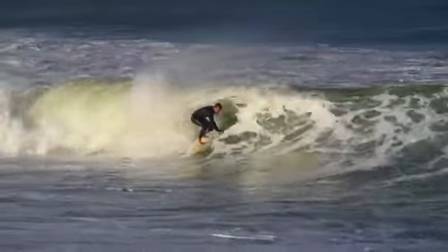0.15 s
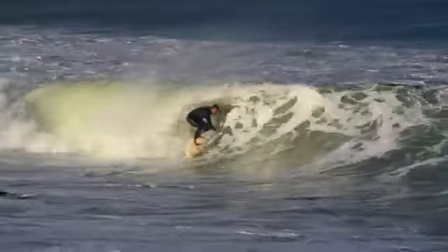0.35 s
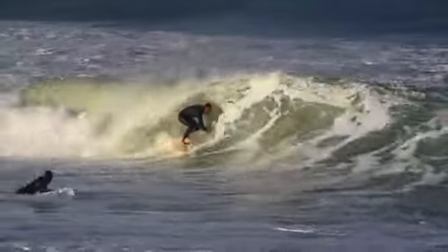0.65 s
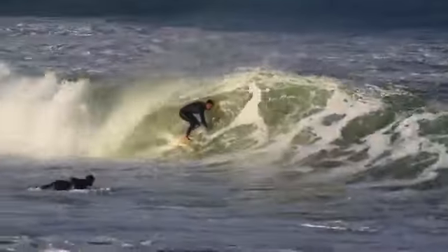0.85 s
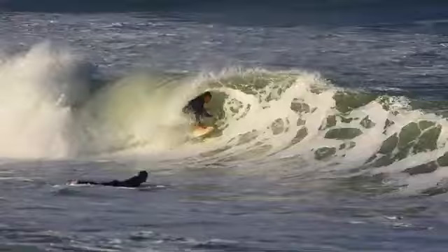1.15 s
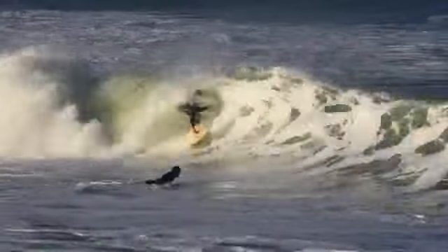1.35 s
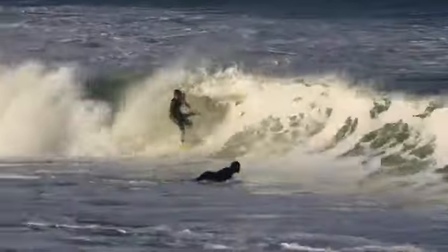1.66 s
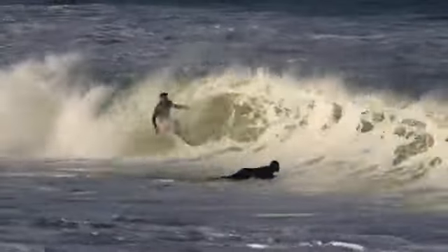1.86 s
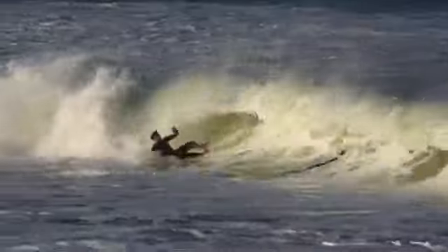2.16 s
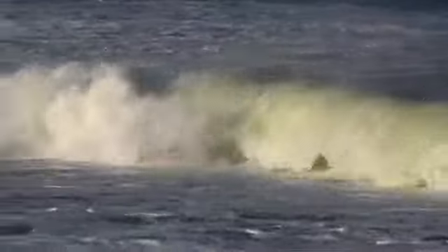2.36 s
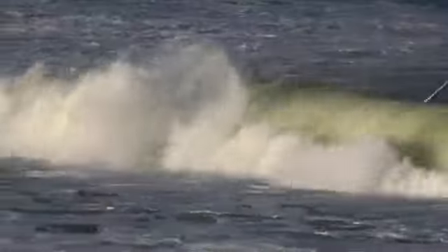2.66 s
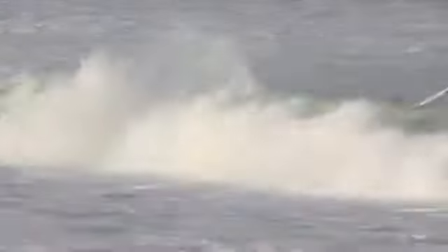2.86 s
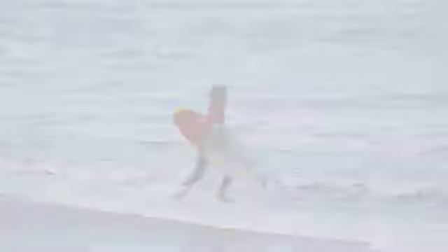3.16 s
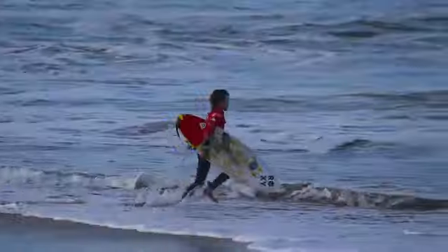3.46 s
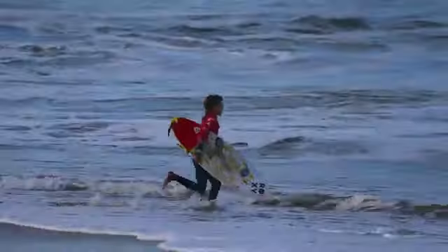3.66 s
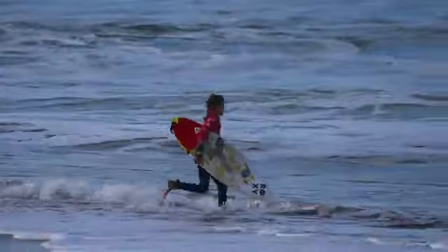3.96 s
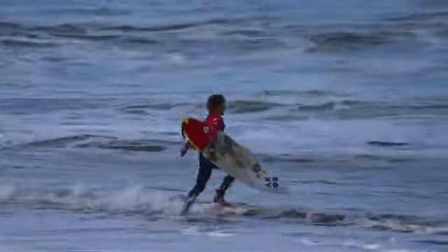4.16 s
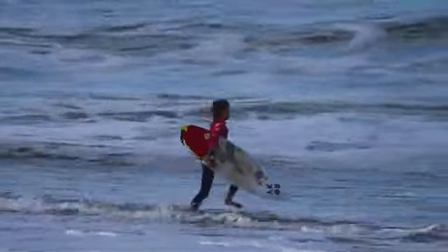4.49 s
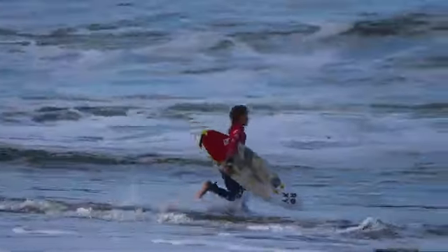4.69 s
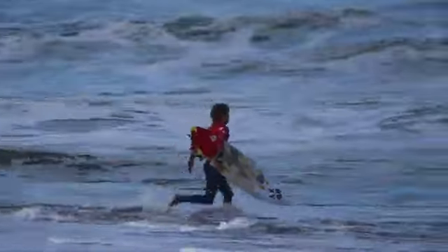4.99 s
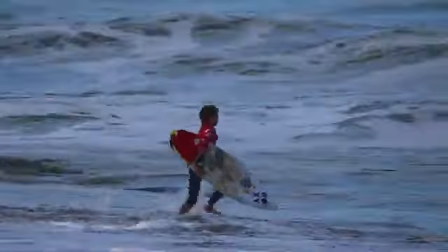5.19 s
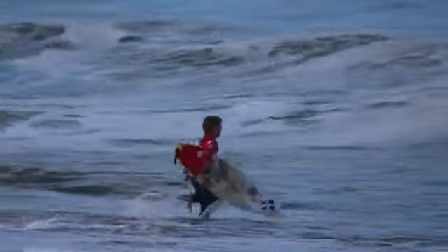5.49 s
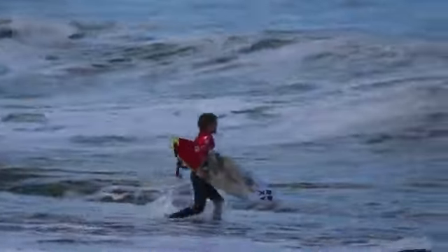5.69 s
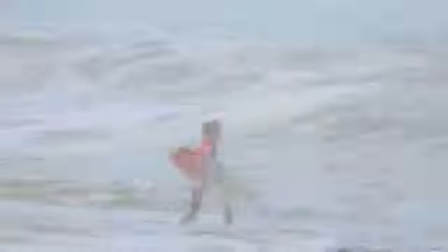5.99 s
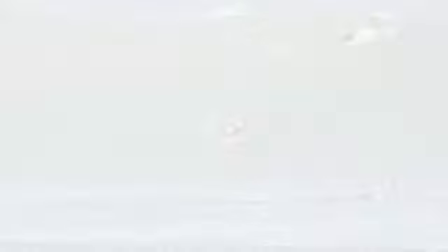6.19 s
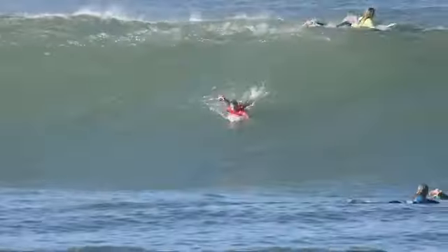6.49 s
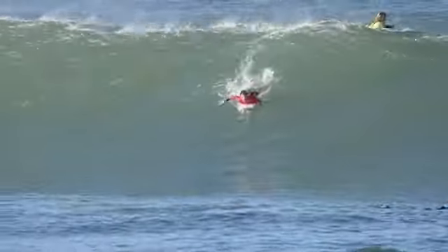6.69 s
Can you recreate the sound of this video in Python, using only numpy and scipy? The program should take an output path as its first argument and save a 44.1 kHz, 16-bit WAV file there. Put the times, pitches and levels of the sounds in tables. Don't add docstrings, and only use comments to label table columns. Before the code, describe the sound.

Outdoors on a windy beach, distant breakers roar steadily and build slightly. At about three seconds a tick and short thump mark an abrupt change to a fuller shore wash, which grows from quieter to stronger while heavier wind buffets the microphone. A tiny hush near six seconds leads into a final, duller swell that eases off.

```python
import sys
import numpy as np
from scipy import signal
from scipy.fft import rfft, irfft, next_fast_len
from scipy.io import wavfile
from scipy.ndimage import uniform_filter1d

SR = 44100
rng = np.random.default_rng(int(sys.argv[2]) if len(sys.argv) > 2 else 0)


def pcm_store(signal):
    levels = np.round(np.clip(np.atleast_2d(signal), -1, 1) * 32767)
    wavfile.write(sys.argv[1], SR, levels.astype(np.int16).T)


def convert_level_to_amplitude(level_db):
    exponent = np.asarray(level_db, float) / 20
    return 10 ** exponent


N = 301644

# start t/s, end t/s
SCENES = [
    (0, 3.1291),
    (3.1291, 6.2256),
    (6.2256, 6.84),
]
CUT_S = [3.1291, 6.2256]
# tick level/dB, tick direction, pressure jump level/dB, rise t/s, fall t/s
CUTS = [
    (-35, 1, -16.5, .0006, .005),
    (-42, -1, -36, .001, .004),
]
THUMP_LAG_S = .0007
GAP_S, GAP_DB = 6.2155, -32
FADE_S, FADE_DB = 0.22, -2.5

HISS_DB = [-121.5, -124, -124.5]
# t/s, level/dB
WHINE = [
    (0, -80.5),
    (1.2, -81.5),
    (1.4, -84),
    (1.75, -77),
    (3.1, -81),
    (3.5, -83),
    (4.3, -87),
    (6.84, -94),
]
WHINE_HZ, WHINE_WIDTH_HZ = 7020, 40

# buffeting level/dB, rumble level/dB, flutter level/dB, top of buffeting f/Hz
BREEZE = [
    (-31.5, -44, -44.5, 11.6),
    (-23, -37, -45, 15.4),
    (-20.5, -36, -44.5, 15.9),
]
# t/s, lift level/dB, half length t/s
GUSTS = [(0.2, 4.5, 0.34), (0.56, 9, 0.069), (0.96, 7.5, 0.16), (1.37, 6.5, 0.11), (1.62, 3, 0.15),
         (1.86, -6, 0.054), (2.25, 7.5, 0.13), (2.56, 8, 0.061), (2.86, 7, 0.08), (3.3, 11, 0.15),
         (3.8, 8, 0.15), (4.04, 6.5, 0.13), (4.29, 12, 0.13), (4.61, 12, 0.15), (5.02, 7, 0.083),
         (5.52, 7, 0.22), (6.22, 4.5, 0.095), (6.52, 2.5, 0.06)]
# t/s, lift level/dB
PUFFS = [(0.1, 4), (0.37, 6), (0.62, 9), (0.83, 5), (1.01, 3), (1.27, 13), (1.52, 5), (1.72, 2), (2.02, 5),
         (2.22, 7), (2.42, 10), (2.95, 0), (3.2, 7.5), (3.48, 6), (3.76, 12), (3.92, 10), (4.1, 4),
         (4.35, 6.5), (4.68, 10), (5.03, 6), (5.42, 5.5), (5.62, 1), (5.92, 4.5), (6.37, 0), (6.51, 5),
         (6.8, 1)]
PUFF_S, FLUTTER_FOLLOWS = 0.049, 0.36

# t/s, vigour of the breaking level/dB, brightness from spray level/dB
SURGE = [
    [(0, -2, 0.8), (0.35, -2, 0.4), (1.05, -1, 0.4), (1.3, -0.5, -0.5), (2.12, 1.5, 0.8), (2.5, 1.8, -0.2),
     (2.9, 3, -1.1), (3.13, 1, -0.3)],
    [(3.13, -3.5, 1.5), (3.5, -3, 0.4), (4.2, -0.5, -0.1), (4.9, 2, 0), (5.3, 1.55, 0.5), (5.7, 2.9, 1),
     (6.1, 2.5, 0.6)],
    [(6.23, 2, 0), (6.45, 0.26, 0.3), (6.84, -0.8, -0.1)],
]
# f/Hz, level/dB per Hz
BREAKER = [(110, -64.5), (175, -70.5), (260, -67.5), (420, -68), (700, -73.5), (1100, -80), (1900, -83),
           (2900, -87), (3900, -89), (4700, -99), (6500, -99.6), (7600, -104.7), (10000, -111.7),
           (15500, -120.5)]
# f/Hz, level/dB per Hz
SHORE = [(70, -60), (175, -73), (260, -70.5), (420, -69), (700, -71), (1100, -73.5), (1900, -80),
         (2900, -88.5), (3900, -91.5), (4700, -99.1), (6500, -101.7), (7600, -107.9), (10000, -114.8),
         (15500, -124.2)]
# f/Hz, level/dB per Hz
SWELL = [(70, -65), (175, -73), (260, -72.5), (420, -72.5), (700, -76), (1100, -80), (1900, -85.5),
         (2900, -93), (3900, -96.5), (4700, -103.4), (6500, -108.0), (7600, -115.2), (10000, -120.0),
         (15500, -124.8)]
# f/Hz, width f/Hz, level/dB
DIPS = [(4550, 260, -1), (6800, 120, -1), (7260, 230, -1.5), (8660, 700, -1.2)]
LAYER_HZ = [350, 1100, 2900, 6500]
# roar, wash, foam, spray [dB per dB]
FOLLOWS = [(0.67, 0.96, 1.13, 0.97), (0.45, 1.2, 0.7, 0.85), (0.6, 0.4, 2.3, 1.6)]
# roar, wash, foam, spray [dB per dB]
BRIGHTENS = (-0.18, -0.62, 0.12, 1.9)
# t/s, lift level/dB, half length t/s
CRASHES = [(0.42, 1.5, 0.098), (1.04, 2, 0.069), (1.46, 1, .08), (2.28, 1.5, .1), (2.8, 1.5, .12),
           (3.95, 1, 0.14), (4.82, 1, 0.077), (5.05, 1.5, 0.061), (6.03, 2.5, .1)]
# roar, wash, foam, spray [dB per dB]
CRASH_SHARE = (1, 0.56, 0.2, 0.05)


def rms_one(x):
    return x / np.sqrt(np.mean(x ** 2) + 1e-20)


def in_time(rows):
    s, *columns = np.transpose(rows)
    return [np.interp(np.arange(N) / SR, s, c) for c in columns]


def lifts(rows):
    t = np.arange(0, N + 64, 64) / SR
    s, db, half = np.transpose(rows)[:, :, None]
    bells = db * np.exp(-((t - s) / half) ** 2)
    return np.interp(np.arange(N) / SR, t, np.sum(bells, axis=0))


def drift(rate):
    r = np.exp(-80 * np.pi * rate / SR)
    noise = rng.standard_normal(N // 40 + 2002)
    slow = signal.lfilter([1], [1, -2 * r, r * r], noise)[2000:]
    return np.interp(np.arange(N) / 40, np.arange(len(slow)), rms_one(slow))


def evened(x, span_s, share):
    power = uniform_filter1d(x ** 2, size=max(3, int(span_s * SR)))
    return rms_one(x / (power + 0.086 * np.mean(power)) ** (share / 2))


def hiss(level_db):
    sos = signal.butter(2, 7000, "high", fs=SR, output="sos")
    return convert_level_to_amplitude(level_db) * np.sqrt(SR / 2) * signal.sosfilt(sos, rng.standard_normal(N))


def whine():
    r, w = np.exp(-np.pi * WHINE_WIDTH_HZ / SR), 2 * np.pi * WHINE_HZ / SR
    tone = signal.lfilter([1, 0, -1], [1, -2 * r * np.cos(w), r * r], rng.standard_normal(N))
    return convert_level_to_amplitude(in_time(WHINE)[0]) * rms_one(tone)


def cuts():
    t, out = np.arange(N) / SR, np.zeros(N)
    for s, (tick_db, way, jump_db, rise, fall) in zip(CUT_S, CUTS):
        out += way * (t >= s) * convert_level_to_amplitude(tick_db) * np.exp(-np.maximum(t - s, 0) / .002)
        age = np.maximum(t - s - THUMP_LAG_S, 0)
        onset = (age / rise) ** 2 / (1 + (age / rise) ** 2)
        out -= convert_level_to_amplitude(jump_db) * onset * np.exp(-age / fall)
    return out


def eddies(low_hz, high_hz, order, span_s, share):
    sos = signal.butter(order, [low_hz, high_hz], "band", fs=SR, output="sos")
    return evened(signal.sosfilt(sos, rng.standard_normal(N + SR))[SR:], span_s, share)


def wind(breeze):
    breeze_buffet_db, breeze_rumble_db, breeze_flutter_db, buffet_top_hz = breeze
    puff_db = lifts([(s, db, PUFF_S) for s, db in PUFFS])
    buffet_db = breeze_buffet_db + lifts(GUSTS)
    rumble_db = breeze_rumble_db + puff_db
    flutter_db = breeze_flutter_db + FLUTTER_FOLLOWS * puff_db - 2.5
    buffet = convert_level_to_amplitude(buffet_db) * eddies(4.4, buffet_top_hz, order=3, span_s=0.17, share=0.86)
    rumble = convert_level_to_amplitude(rumble_db) * eddies(16, 41, order=4, span_s=0.04, share=0.89)
    flutter = convert_level_to_amplitude(flutter_db) * eddies(43, 79, order=3, span_s=0.092, share=0.23)
    return buffet + rumble + flutter


def surf(spectrum, surge, follows, running, churn_db, patch_db):
    length = running.sum()
    size = next_fast_len(length)
    log_hz = np.log2(np.arange(1, size // 2 + 2) * SR / size)
    points = np.array(spectrum)
    colour_db = np.interp(log_hz, np.log2(points[:, 0]), points[:, 1])
    colour_db -= 14 * np.maximum(log_hz - np.log2(9500), 0)
    for hz, width_hz, db in DIPS:
        colour_db += db * np.exp(-((2 ** log_hz - hz) / width_hz) ** 2)
    sea = rfft(rng.standard_normal(size)) * np.sqrt(SR / 2) * convert_level_to_amplitude(colour_db)

    churn = drift(25) + 0.25 * drift(7.8)
    vigour_db, bright_db = in_time(surge)
    swell_db = np.outer(follows, vigour_db) + np.outer(BRIGHTENS, bright_db)
    swell_db += np.outer(CRASH_SHARE, lifts(CRASHES))

    out = np.zeros(N)
    for centre in np.arange(np.log2(100), np.log2(20000), .5):
        window = np.cos(np.pi * np.clip(log_hz - centre, -.5, .5)) ** 2
        share = [np.interp(centre, np.log2(LAYER_HZ), one) for one in np.eye(len(LAYER_HZ))]
        near = np.clip((centre - np.log2(250)) / 2, 0, 1)
        gain_db = share @ swell_db + near * churn_db * churn + patch_db * drift(7.1)
        out[running] += irfft(sea * window, size)[:length] * convert_level_to_amplitude(gain_db[running])
    return out


def scene():
    t = np.arange(N) / SR
    sea, air = np.zeros((2, N))
    for (start, end), spectrum, surge, follows, breeze, hiss_db in zip(
            SCENES, (BREAKER, SHORE, SWELL), SURGE, FOLLOWS, BREEZE, HISS_DB):
        running = (t >= start) & (t < end)
        sea += surf(spectrum, surge, follows, running, churn_db=0.46, patch_db=0.09)
        sea += running * hiss(hiss_db)
        fade_in = np.clip((t - start) / .02, 0, 1) if start else 1
        fade_out = np.clip((end - t) / .015, .2 * (end > CUT_S[-1]), 1)
        air += running * fade_in * fade_out * wind(breeze)

    end, start = GAP_S, SCENES[2][0]
    hush = convert_level_to_amplitude(GAP_DB)
    gate = np.interp(t, [end - .002, end, start, start + .0006], [1, hush, hush, 1])
    gate *= np.clip(np.abs(t - CUT_S[0]) / .0005, 0, 1)
    gate *= convert_level_to_amplitude(np.interp(t, [CUT_S[0] - FADE_S, CUT_S[0]], [0, FADE_DB], right=0))
    air_gate = np.interp(t, [end - .006, end, start, start + 0.00066], [1, 0, 0, 1])
    return (gate * (sea + whine()) + air_gate * air + cuts())[None]


def band_limit(x):
    return signal.sosfilt(signal.butter(12, 15720, fs=SR, output="sos"), x)


def record(dry):
    mix = 0.89 * np.tanh(dry / 0.91)
    return band_limit(mix)


dry = scene()
out = record(dry)
pcm_store(out)
```